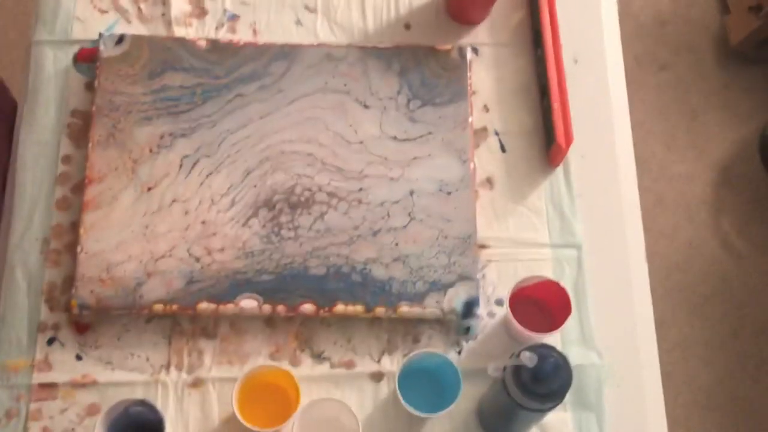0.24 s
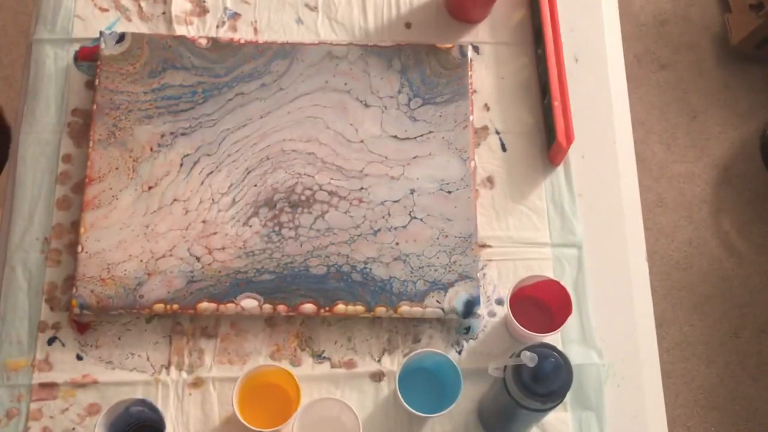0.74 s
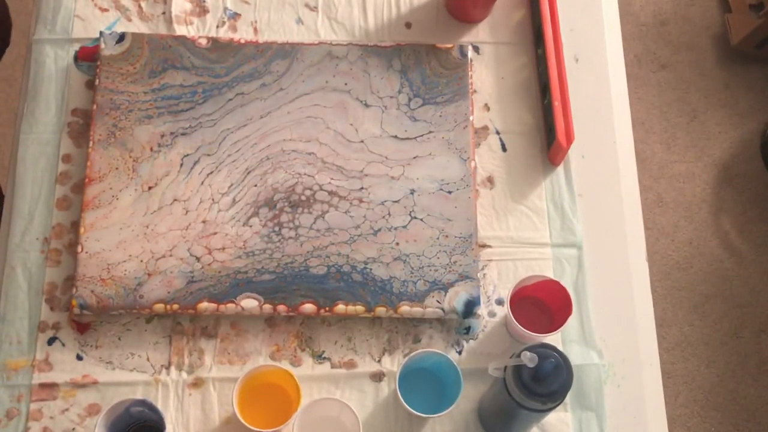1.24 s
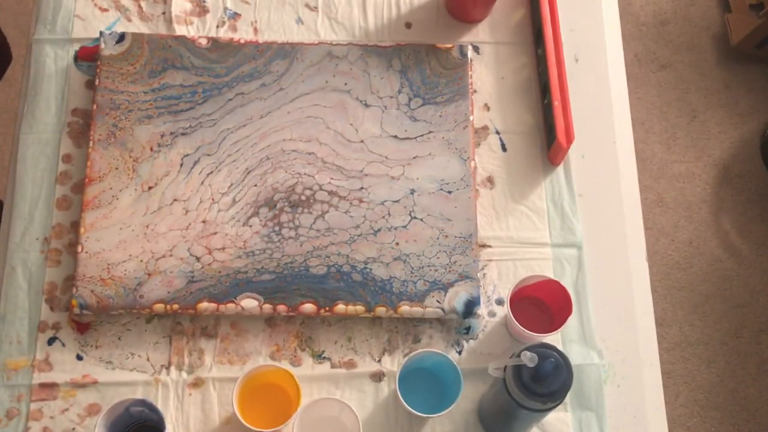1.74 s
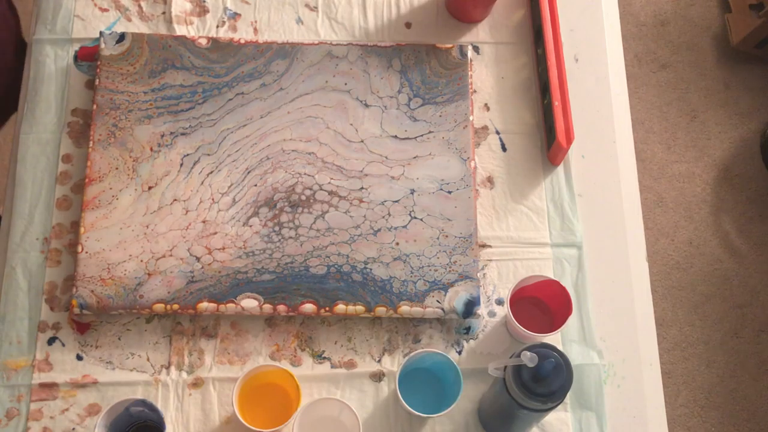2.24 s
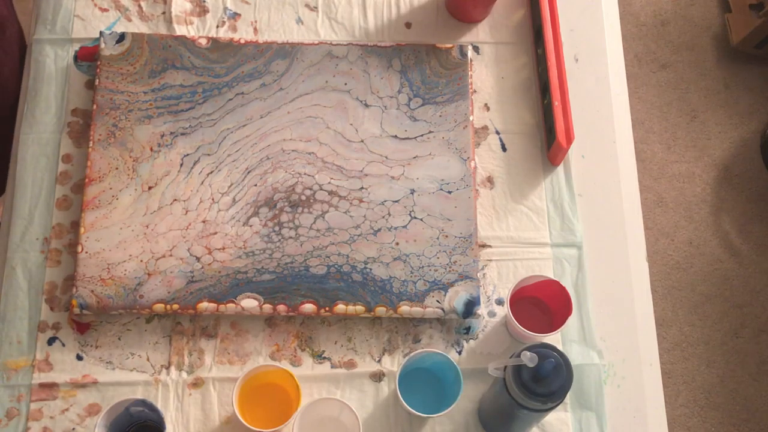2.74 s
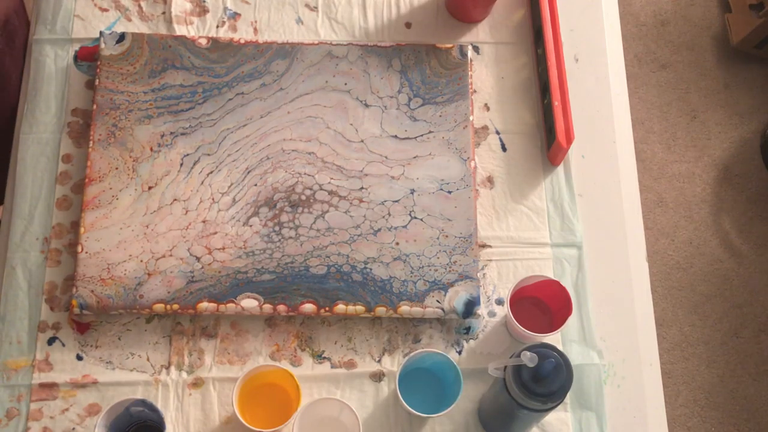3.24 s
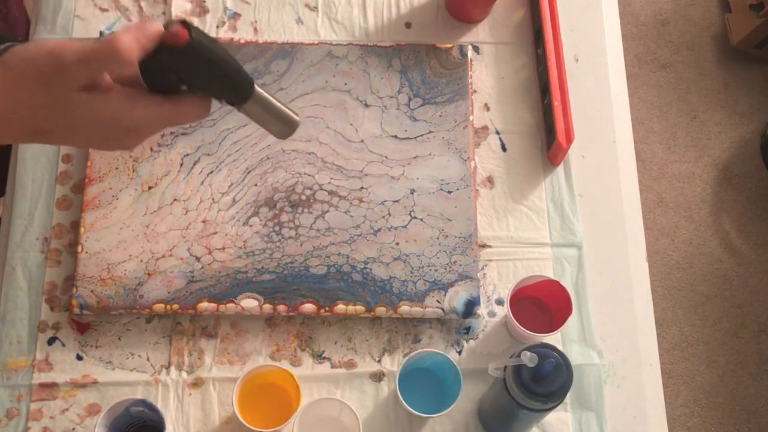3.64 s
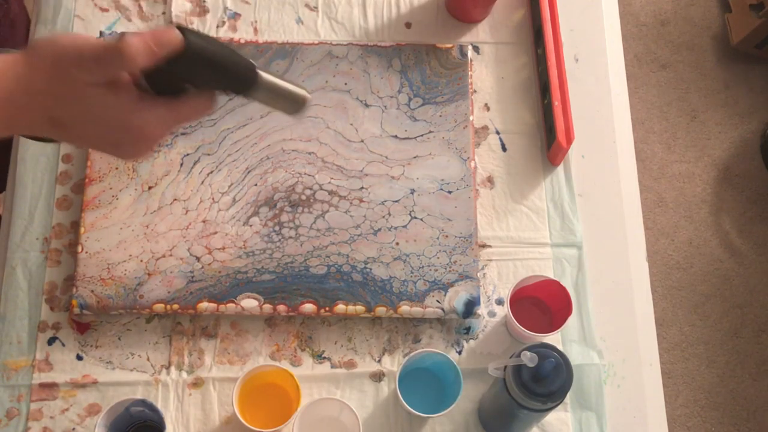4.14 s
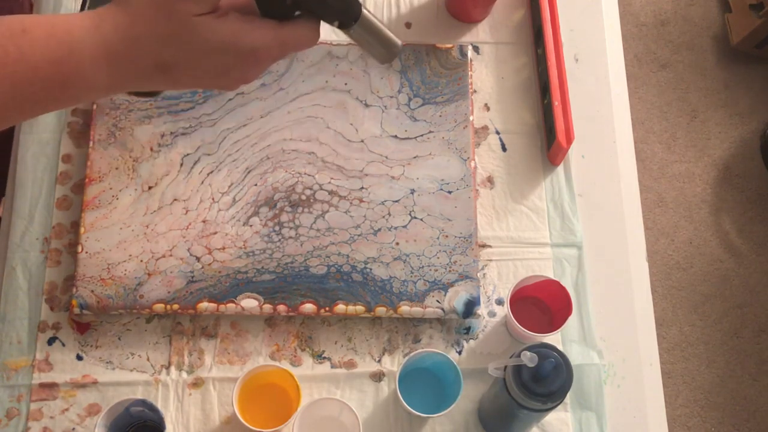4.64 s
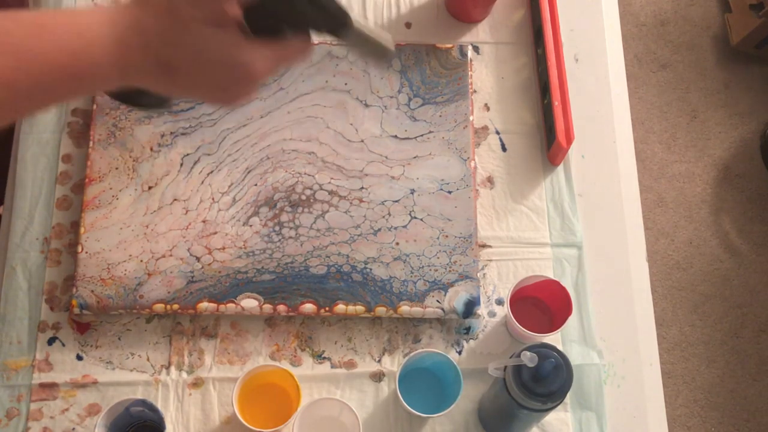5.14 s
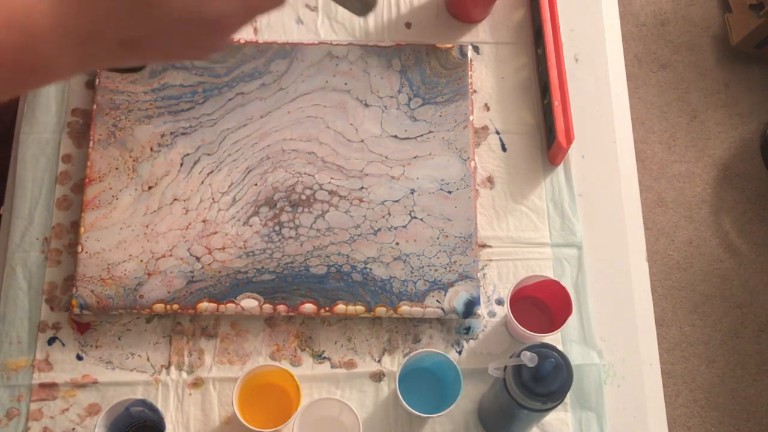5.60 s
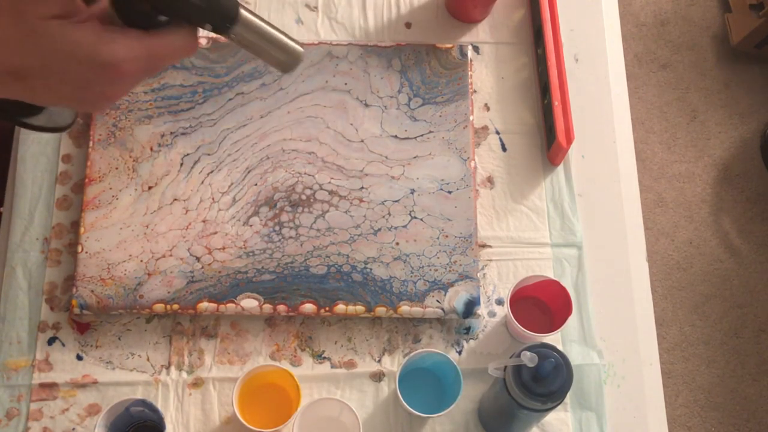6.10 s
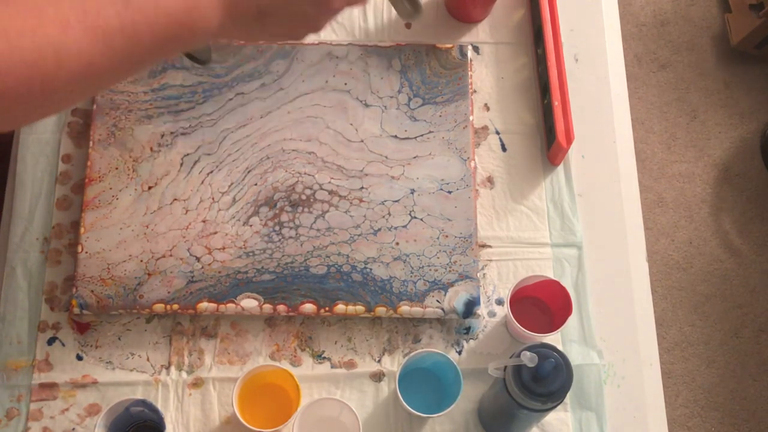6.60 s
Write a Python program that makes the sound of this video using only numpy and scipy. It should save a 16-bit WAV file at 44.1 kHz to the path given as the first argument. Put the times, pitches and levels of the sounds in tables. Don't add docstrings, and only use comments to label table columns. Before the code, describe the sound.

Light handling taps and a soft table knock, then repeated hard metallic igniter clicks and swelling gas hiss over a low room rumble.

```python
import sys
import numpy as np
from scipy import signal
from scipy.fft import rfft, irfft
from scipy.io import wavfile

SR = 44100
rng = np.random.default_rng(int(sys.argv[2]) if len(sys.argv) > 2 else 0)


def wav_out(sig):
    wavfile.write(sys.argv[1], SR, np.round(np.clip(np.atleast_2d(sig).T, -1, 1) * 32767).astype(np.int16))


def how_loud(loudness_db):
    steps = np.asarray(loudness_db, float) / 20
    return 10 ** steps


N = 302526


def rms_one(x):
    return x / np.sqrt(np.mean(x ** 2) + 1e-20)


def at_hz(points, hz):
    table_hz, level_db = np.transpose(points)
    return np.interp(np.log(hz), np.log(table_hz), level_db)


def in_time(rows):
    s, *columns = np.transpose(rows)
    return [np.interp(np.arange(N) / SR, s, c) for c in columns]


def drift(rate_hz):
    r = np.exp(-80 * np.pi * rate_hz / SR)
    slow = signal.lfilter([1], [1, -2 * r, r * r], rng.standard_normal(N // 40 + 2002))[2000:]
    return np.interp(np.arange(N) / 40, np.arange(len(slow)), rms_one(slow))


def resonate(x, hz, width_hz):
    r = np.exp(-np.pi * width_hz / SR)
    zeros = np.array([1, 0, -1]) * (1 - r * r) / 2
    return signal.lfilter(zeros, [1, -2 * r * np.cos(2 * np.pi * hz / SR), r * r], x)


def smooth_cut(x, hz, kind, order):
    return signal.sosfilt(signal.butter(order, hz, kind, fs=SR, output="sos"), x)


def steep_low_pass(x, hz, order):
    return signal.sosfilt(signal.cheby2(order, 60, hz, "low", fs=SR, output="sos"), x)


def coloured(spectrum, patchy_db):
    hz = np.maximum(np.arange(N // 2 + 1) * SR / N, 10)
    shaped = rfft(rng.standard_normal(N)) * how_loud(at_hz(spectrum, hz))
    out, together = 0, drift(3.4)
    for centre_hz in 30 * 2 ** np.arange(10):
        octave = np.cos(np.pi / 2 * np.clip(np.log2(hz / centre_hz), -1, 1)) ** 2
        flicker_db = patchy_db * (0.56 * together + drift(14.0))
        out = out + irfft(shaped * octave, N) * how_loud(flicker_db)
    return rms_one(out)


def rings(modes, size):
    hz, level_db, t60_s = np.transpose(modes)[:, :, None]
    t = np.arange(size) / SR
    return how_loud(level_db - 60 * t / t60_s) * np.sin(2 * np.pi * hz * t)


def struck(modes, blows, spread_db):
    out, body = np.zeros(N + SR), rings(modes, SR)
    signs = (-1) ** np.arange(len(modes))
    for s, db in blows:
        at = round(s * SR)
        mode_db = db - 8.5 + spread_db * rng.standard_normal(len(modes))
        out[at:at + SR] += (how_loud(mode_db) * signs) @ body
    return out[:N]


# frequency in Hz, level in dB per Hz.
AIR_SPECTRUM = [(20, -12), (30, -9), (45, 3), (80, -3.5), (125, -8.5), (150, -11), (300, -10), (900, -8.5),
                (1300, -11.5), (2000, -29), (3600, -45.5), (7000, -43), (15000, -47)]
# frequency in Hz, width in Hz, level in dB.
HUM = (117, 8.8, -68.5)


def room_air():
    hum_hz, width_hz, hum_db = HUM
    hum = rms_one(resonate(rng.standard_normal(N), hum_hz, width_hz))
    return how_loud(-57) * coloured(AIR_SPECTRUM, patchy_db=1.5) + how_loud(hum_db) * hum


# frequency in Hz, width in Hz, level in dB.
WHINE_LINES = [
    (4555.3, 420, 5),
    (5036.9, 130, -0.5),
    (5500, 220, -7.5),
]
# time in seconds, whine level in dB, share of the middle line in dB.
WHINE_WAVER = [(0, -67, -5), (.25, -69, 2), (.55, -67, -10), (1.3, -67, -0.5), (1.6, -69, -10),
               (2, -66, -3), (2.3, -71.5, -10), (2.55, -67, -3), (3, -67.5, -14), (3.45, -67.5, -4.5),
               (4, -67.5, -3.5), (4.7, -70, -9.5), (5, -70, 0), (5.4, -70, -6), (5.75, -63.5, -8),
               (6.05, -71, -9), (6.4, -65, -6), (6.86, -72, -9)]


def whine():
    level_db, line_db = in_time(WHINE_WAVER)
    noise = rng.standard_normal(N)
    bands = []
    for hz, width_hz, db in WHINE_LINES:
        band = rms_one(resonate(resonate(noise, hz, width_hz), hz, width_hz))
        bands.append(band * how_loud(db + 2.1 * drift(3.5)))
    low, line, high = bands
    return how_loud(level_db - 7.0) * (low + high + how_loud(line_db + 7.5) * line)


# start in seconds, level in dB.
KNOCKS = [
    (.006, -41.5),
    (.027, -40.5),
    (.050, -26),
    (.088, -34),
    (.119, -42.5),
]
# frequency in Hz, level in dB, t60 in seconds.
TABLE_MODES = [(42, -8, 0.89), (72.6, -4, 0.32), (102.3, 4.5, 0.2), (187, -1, 0.089), (263, -5, 0.089),
               (327.5, 1.5, 0.14), (427, -12.5, 0.08), (630, -15, 0.073), (1330, -13, 0.037)]


def table_knock():
    return struck(TABLE_MODES, KNOCKS, 0.967)


# start in seconds, strength, brightness and barrel share in dB.
HANDLING = [(.0346, -57, -9, 3), (0.042, -65, 9, 4), (.050, -55.5, -20, 10), (0.1258, -55, 10, 4.5),
            (0.1542, -57, 3, 0), (.172, -58.5, -3, 11), (.5222, -69.5, -3, 16), (.535, -68, 4, 4),
            (.755, -70, 3, 12), (.775, -66, -7, 1), (.8123, -57.5, 3, 4), (.975, -56.5, -13.5, -2),
            (.992, -67, 0, 2), (1.1726, -56, -8, 3.5)]
# start in seconds, strength, brightness, barrel share in dB, favoured resonance in Hz.
SNAPS = [(0.839, -49.5, -5, -3, 11600), (1.358, -49.5, -3, 2, 11100), (1.4095, -47, -4, -3, 7160),
         (1.481, -30, -0.5, 2.5, 14400), (1.8037, -23.5, 2.5, -1.5, 11100), (2.1337, -37.5, -7.5, 1, 15500),
         (2.3676, -31.5, -7.5, 1.5, 15400), (2.6802, -23, 1.5, -5, 9430), (3.006, -39, -11.5, -3.5, 15000),
         (3.0739, -40, -5, -0.5, 10800), (3.5446, -30.5, -1, -1, 15000), (3.921, -24, 5, -5.5, 9086),
         (3.9845, -22.5, 2, 4.5, 9122), (4.4642, -30.5, 7.5, -2.5, 9500), (4.7704, -29, 3, -.5, 15600),
         (5.0813, -24.5, 3, -3.5, 10650), (5.3836, -43.5, 5, -6, 8650), (5.8278, -30, 5, 0, 14590),
         (6.2073, -24, 0.5, -4, 9000), (6.2794, -21, -1, 3.5, 8500), (6.6119, -33.5, 7.5, 5, 8400)]
# start in seconds, strength, brightness and barrel share in dB.
TICKS = [(1.6407, -54, -10, -3), (1.678, -51, -7, 1), (2.0914, -51.5, -4.5, 5), (2.245, -63, -12, -8),
         (2.284, -52, -16, 2), (2.329, -58, -3, 2), (2.5775, -50.5, -5.5, 1), (2.8768, -59.5, 2, 3),
         (2.915, -61, -23, -6), (3.2074, -69, 10.5, 4), (3.2857, -59.5, 0, 4), (3.4462, -53.5, -8, -4),
         (3.46, -55.5, -4, 0), (3.698, -48.5, -5.5, -2), (3.752, -52.5, 4, -2.5), (4.371, -46.5, -8, -3.5),
         (4.553, -55, -18, -1), (4.6725, -59, -6, -0.5), (4.8974, -54, -9, 1.5), (4.946, -55.5, -8, -3.5),
         (5.4051, -40.5, -10.5, -1), (5.4421, -44, 0, 0.5), (5.7124, -56.5, 2, -2), (5.9768, -49.5, -3, 0),
         (6.042, -47.5, -9.5, -2), (6.53, -57, 3, 2)]
# start in seconds, strength, brightness and barrel share in dB.
SLIPS = [(1.471, -59, -6, -2), (1.478, -54, 0, -7), (2.358, -47, -7, 1), (2.670, -54, 6, -3),
         (3.506, -60.5, -2, 0), (3.527, -63, 8, 5), (3.534, -67, -1.5, 12), (4.437, -46.5, -19, 1),
         (4.448, -56, -26, 1), (4.739, -54, 12, 7.5), (5.07, -63.5, 8, -13), (5.434, -45.5, -1, -2.5),
         (5.796, -59.5, 9, 3), (5.816, -54.5, -1, 2), (6.6, -43, -9.5, 5)]
# start in seconds, level in dB.
RELEASES = [
    (3.9841, -9.5),
    (6.2793, -9.5),
]
# frequency in Hz, level in dB, t60 in seconds.
CASE = [(1350, -13.5, 0.0072), (1497, -1.5, 0.012), (1667, 1, 0.014), (2100, -5.5, 0.01)]
BARREL = [(2703, 1.5, 0.0053), (3334, -0.5, 0.0046), (3900, 0, 0.0063), (4353.2, 4, 0.0036),
          (5420, -6, 0.0077), (6050, 2, 0.0031)]
SPRING = [(6830, -5, 0.0056), (7380, -6, 0.007), (8300, -7.5, 0.0091), (9200, 5.5, 0.0016)]
CRACK = [(11100, 0.36, 0.0042), (11900, -1.1, 0.0028), (13200, -1, 0.0046), (14300, 0.13, 0.0028),
         (15740, -0.31, 0.0033)]
LATCH = [(3000, -4, 0.016), (3570, -11.5, .01), (4017.7, 3, 0.012), (4696.8, 5, 0.011), (5200, 1.5, .01),
         (5510, 2.5, 0.022), (5940, 0.5, .014)]
PARTS = (CASE, BARREL, SPRING, CRACK, LATCH)


def shares(strength_db, bright_db, barrel_db):
    crack_db = 0.064 * (strength_db + 40)
    top_db = strength_db + bright_db / 2
    return strength_db - bright_db / 2, strength_db + barrel_db, top_db - crack_db, top_db + crack_db


def igniter():
    out, energy = np.zeros(N + 1024), np.zeros((len(PARTS), N))
    parts = [rings(modes, size=512) for modes in PARTS]
    t = np.arange(160) / SR
    swell = (t / .0006) ** 1.52 * np.exp(-t / 0.00042)
    blows = [*np.array(SNAPS)[:, :-1], *HANDLING, *TICKS, *SLIPS]
    hits = [(s, k, db + 20.5) for s, *blow in blows for k, db in enumerate(shares(*blow))]
    hits += [(s, len(PARTS) - 1, db + 14.5) for s, db in RELEASES]
    for s, k, db in hits:
        uneven = how_loud(5 * rng.standard_normal(160))
        contacts = swell * rng.standard_normal((len(parts[k]), 160)) * uneven
        ring = sum(np.convolve(rms_one(c), mode) for c, mode in zip(contacts, parts[k]))
        at = round(s * SR)
        out[at:at + len(ring)] += how_loud(db) * ring / np.sqrt(np.sum(ring ** 2))
        energy[k, at] += how_loud(2 * db)
    return out[:N], energy


# delay in seconds, level in dB.
ECHOES = [
    (.0026, -10),
    (.0092, -11.5),
    (0.012, -18),
    (.018, -18),
    (.027, -21),
]


def echoes(x):
    table_top, *walls = [how_loud(db) * np.roll(x, round(s * SR)) for s, db in ECHOES]
    return table_top + smooth_cut(sum(walls), 7000, "low", order=2)


# t60 in seconds, energy in dB.
REVERB = [
    (0.25, -3),
    (0.24, -2.5),
    (0.25, -4.5),
    (0.19, -5.5),
    (0.28, -2),
]


def room_tail(energy):
    out, build = 0, np.exp(-1 / (0.001 * SR))
    for modes, blows, (t60_s, energy_db) in zip(PARTS, energy, REVERB):
        keep = how_loud(-120 / (t60_s * SR))
        left = signal.lfilter([1 - keep], [1, -keep], blows + 1e-18)
        left = signal.lfilter([1 - build], [1, -build], np.roll(left, round(0.0019 * SR)))
        power = np.sum(np.abs(rfft(rings(modes, size=2048))) ** 2, axis=0)
        bins, coarse = np.linspace(0, 1, N // 2 + 1), np.linspace(0, 1, len(power))
        colour = np.interp(bins, coarse, np.sqrt(power))
        noise = rms_one(irfft(rfft(rng.standard_normal(N)) * colour, N))
        out = out + how_loud(energy_db + 2.0 * drift(65.0)) * np.sqrt(left) * noise
    return out


# opens in seconds, shuts in seconds, first hiss in dB, last hiss in dB.
GAS = [
    (1.5, 2.2, -63, -62),
    (2.4, 3.029, -64, -62),
    (3.58, 4.101, -67, -60.5),
    (4.1, 5.402, -60, -64.5),
    (5.861, 6.599, -66, -58.5),
    (6.6, 6.998, -64.5, -61.5),
]


def valve():
    open_db_per_s, shut_db_per_s, leak_db = 150, 93, -77.5
    t, held = np.arange(N) / SR, []
    for on, off, first_db, last_db in GAS:
        level_db = np.interp(t, [on, off], [first_db, last_db])
        level_db -= open_db_per_s * np.maximum(on - t, 0)
        held.append(level_db - shut_db_per_s * np.maximum(t - off, 0))
    return np.maximum(np.max(held, axis=0), leak_db)


# centre in seconds, half length in seconds, level in dB.
RUSTLE = [(0.074, 0.086, -61), (.32, .05, -71), (0.422, 0.04, -67), (0.545, 0.05, -73.5), (.68, .1, -79),
          (1.196, 0.16, -69.5)]
# frequency in Hz, level in dB per Hz.
JET_SPECTRUM = [(700, -18), (1500, 8), (2200, 6), (4000, 2), (6000, 0.5), (9000, -1.5), (12500, -2),
                (15500, -8)]


def gas_and_fingers():
    hiss_db, t = valve(), np.arange(N) / SR
    fingers = sum(how_loud(db - 10.45 * ((t - s) / half_s) ** 2) for s, half_s, db in RUSTLE)
    jet = coloured(JET_SPECTRUM, patchy_db=1.5)
    roar = smooth_cut(jet, 4500, "low", order=2)
    hiss = rms_one(jet - roar)
    roar_db = -63 + 0.54 * (hiss_db - hiss_db.max())
    return (how_loud(roar_db) + 0.98 * fingers) * rms_one(roar) + (how_loud(hiss_db + 1.0) + fingers) * hiss


PING = (.522, -58, 11903, .15)


def ping():
    s, db, hz, t60_s = PING
    return struck([(hz, 0, t60_s)], [(s, db)], 0)


# start in seconds, frequency in Hz, level in dB.
LINGER = [(1.358, 2450, -60), (1.4819, 3880, -38), (1.8035, 1500, -29), (2.133, 3860, -44),
          (2.3677, 2700, -37), (2.6805, 5840, -32), (3.007, 2430, -50), (3.074, 2460, -49.5),
          (3.5455, 8700, -40.5), (3.5449, 14300, -26), (4.4642, 15400, -39), (5.8271, 8250, -31.5),
          (5.8271, 14600, -27), (2.6804, 15400, -29), (6.2793, 3200, -28.5), (6.2075, 15000, -32),
          (3.9212, 10980, -30), (1.8038, 8330, -32.5), (3.9214, 7200, -31), (3.984, 4400, -33),
          (4.7712, 2300, -45), (5.0816, 6000, -36), (5.7123, 2300, -58.5), (5.8269, 3980, -31.5),
          (6.2075, 3860, -34), (6.2796, 1667, -25), (6.6119, 3280, -40.5)]


def accents():
    out, t = np.zeros(N + SR), np.arange(SR // 4) / SR
    bursts = [(s, hz, db + bright_db / 2 - 4, 900, 1800 / hz) for s, db, bright_db, _, hz in SNAPS]
    bursts += [(s, hz, db, 150 + .09 * hz, min(.25, 1500 / hz)) for s, hz, db in LINGER]
    for s, hz, db, width_hz, t60_s in bursts:
        shape = np.clip(t / 0.00097, 0, 1) * (how_loud(-60 * t / 0.0093) + how_loud(-17.5 - 60 * t / t60_s))
        noise = rng.standard_normal(len(t) + 1000)
        band = resonate(resonate(noise, hz, width_hz), hz, width_hz)[-len(t):]
        at = round(s * SR)
        out[at:at + len(t)] += how_loud(db + 10.0) * shape * rms_one(band)
    return out[:N]


# start in seconds, peak in dB.
PUSHES = [(1.481, -36.5), (1.803, -45), (2.367, -38), (3.544, -35), (3.984, -43), (4.771, -36.5),
          (5.081, -62), (5.827, -34.5), (6.28, -41)]
# frequency in Hz, width in Hz, level in dB.
GRIP = [(529, 220, -8), (708, 140, -4), (1033, 220, -2), (1185, 290, -0.5)]


def thumb():
    out, t = np.zeros(N + SR), np.arange(SR // 4) / SR
    shape = np.clip(t / 0.0032, 0, 1) * (how_loud(-60 * t / 0.026) + how_loud(-12.0 - 60 * t / 0.22704))
    for s, peak_db in PUSHES:
        body = 0
        for hz, width_hz, db in GRIP:
            noise = rng.standard_normal(len(t))
            body = body + how_loud(db) * resonate(resonate(noise, hz, width_hz), hz, width_hz)
        at = round(s * SR)
        out[at:at + len(t)] += how_loud(peak_db + 4.0) * shape * rms_one(body)
    return out[:N]


# frequency in Hz, level in dB, t60 in seconds.
STRIKER = [(4320, 0, 0.0046), (5730, -8, .006)]


def latch_strike():
    return struck(STRIKER, [(s + .0004, db + 14.5) for s, db in RELEASES], 0)


def scene():
    snaps, energy = igniter()
    snaps = snaps + latch_strike()
    reflected = echoes(snaps) + room_tail(energy)
    direct, reflected = smooth_cut([snaps, reflected], 1215, "high", order=6)
    blows = table_knock() + thumb() + ping()
    steady = reflected + accents() + gas_and_fingers() + blows + room_air() + whine()
    return (direct + steep_low_pass(steady, 16050, order=24))[None]


def top_cut(x):
    return signal.sosfilt(signal.butter(12, 17140, fs=SR, output="sos"), x)


def record(dry):
    heard = dry - .42 * resonate(dry, hz=10400, width_hz=600)
    held = np.clip(heard, -.94, .94)
    return top_cut(steep_low_pass(held, 16950, order=16))


dry = scene()
out = record(dry)
wav_out(out)
```